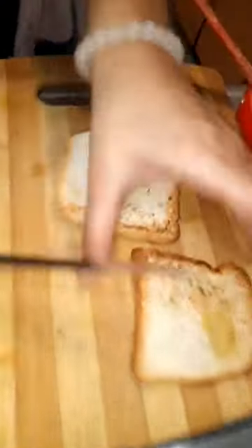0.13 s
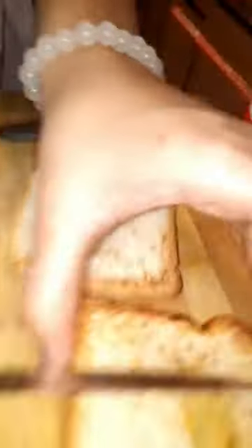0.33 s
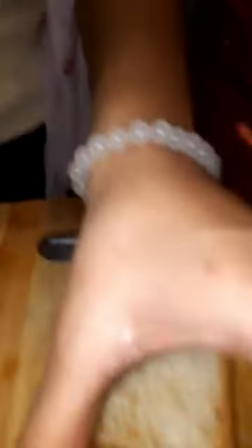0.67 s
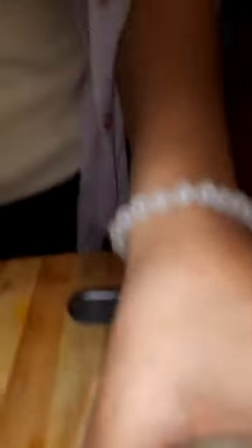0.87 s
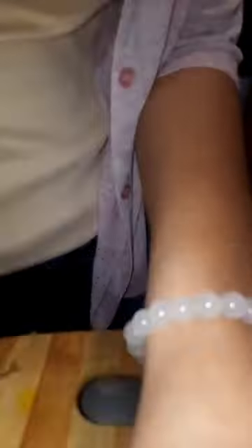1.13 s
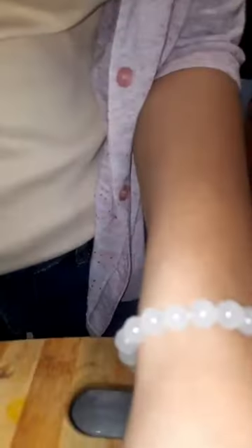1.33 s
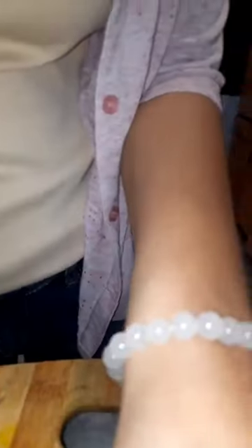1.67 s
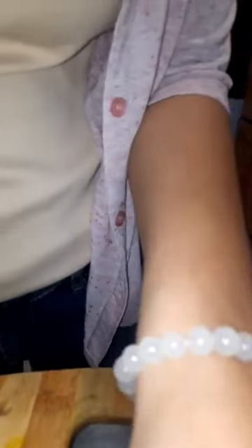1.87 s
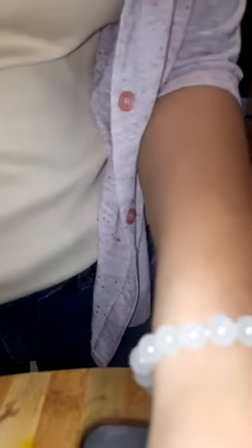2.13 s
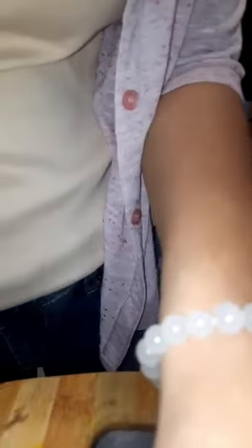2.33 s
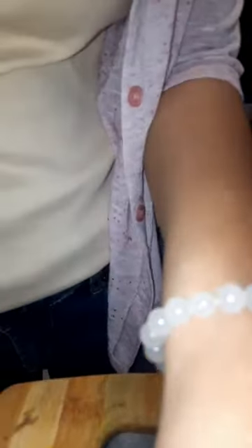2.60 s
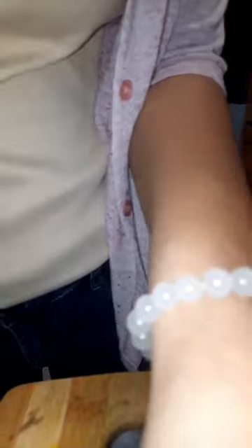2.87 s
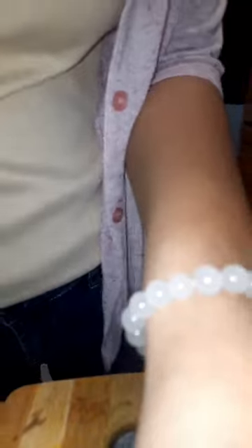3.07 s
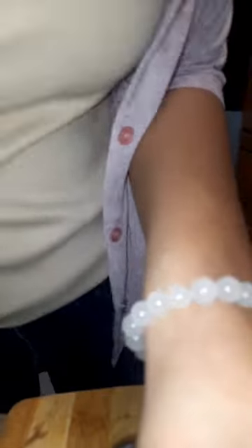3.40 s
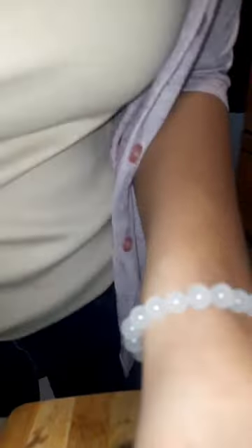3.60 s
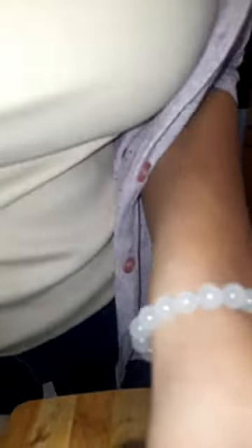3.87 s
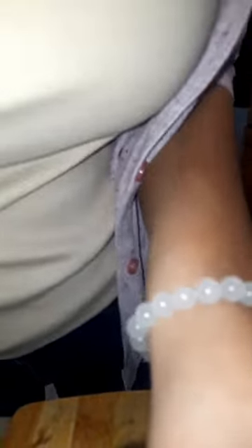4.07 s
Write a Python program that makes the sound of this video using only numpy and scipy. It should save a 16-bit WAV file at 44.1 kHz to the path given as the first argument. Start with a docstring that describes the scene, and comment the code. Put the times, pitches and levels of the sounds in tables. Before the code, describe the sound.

A knife rasps across crisp toast in short dry crunches, close up, with dull hand thumps bumping the microphone early on.

```python
"""Right beside a hand-held two-port microphone, a knife rasps over crisp toast in quick strokes.
Each stroke gates a train of tiny random clicks and lets them ring resonances of crust and crumbs; the clicks
common to both ports reach the left one late, and the body of a stroke is weak there. Clicks and smooth noise
rustle in the gaps. The gripping hand rumbles on the casing as lumpy low noise, and jolts are strongest at the
left. Short clicks make single touches, a decaying sine makes one knock, and a faint mid-band hiss fades in."""
import sys
import numpy as np
from scipy import signal
from scipy.io import wavfile

SR = 44100
rng = np.random.default_rng(int(sys.argv[2]) if len(sys.argv) > 2 else 0)


def output_pcm(signal):
    """Save a mono or channel-first signal as 16-bit PCM at the path in sys.argv[1].

    Samples are clipped to [-1, 1] before scaling.
    """
    pcm = np.clip(np.atleast_2d(signal).T, -1, 1) * 32767
    wavfile.write(sys.argv[1], SR, np.round(pcm).astype(np.int16))


N = 186498

# How the grip turns the ports. Each row: time in seconds, crunch left-right difference in dB,
# brightness in dB per octave.
GRIP_TURN = [(.2, -32, -12.5), (.32, -16, -12), (.68, -41, 12), (.85, -31, 5), (.93, -18, 5.5),
             (1.03, -37, 8), (1.13, -11, 4.5), (1.24, 1, 1.5), (1.32, -2, 3), (1.38, -36, 5),
             (1.51, -17, 3), (1.65, 3, 2.5), (2.3, 0.5, 2.5), (3.1, 4.5, 2.5), (3.53, 18, 4),
             (3.69, 5, 1.3), (3.9, 2.5, 1.5), (4.2, 5, 0.9)]
TILT_ABOUT_HZ = 1430   # brightness slopes pivot here


def from_db(db):
    """Level is logarithmic: 20 dB is a factor of ten in amplitude."""
    return 10 ** (np.asarray(db) / 20)


def rms_one(x):
    """Normalise the mean power of each row to one."""
    return x / np.sqrt(np.mean(x ** 2, axis=-1, keepdims=True) + 1e-20)


def lowpass(x, seconds):
    """First-order relaxation: one pole with the given time constant."""
    r = np.exp(-1 / (max(seconds, 1e-4) * SR))
    return signal.lfilter([1 - r], [1, -r], x + 1e-18)


def drift(rate, count):
    """Slow random fluctuation: white noise relaxed twice with corner `rate` in Hz, at rms 1."""
    seconds = 1 / (2 * np.pi * rate)
    return rms_one(lowpass(lowpass(rng.standard_normal((count, N)), seconds), seconds))


def ring(x, hz, width):
    """Resonance: a two-pole resonator passed twice for steep skirts, near rms 1 on white input of rms 1."""
    r = np.exp(-np.pi * width / SR)
    b = [(1 - r * r) / 2, 0, (r * r - 1) / 2]
    a = [1, -2 * r * np.cos(2 * np.pi * hz / SR), r * r]
    twice = signal.lfilter(b, a, signal.lfilter(b, a, x))
    return np.sqrt(2 * SR / (np.pi * width)) * twice


def along(rows, s):
    """Linear interpolation of a table's columns at the given times."""
    columns = np.transpose(rows)
    return np.array([np.interp(s, columns[0], c) for c in columns[1:]])


def room_hiss():
    """Band-limited noise: faint independent mid-band hiss at each port."""
    level_db, low_hz, high_hz, from_s = -62, 1500, 2700, 1.0
    band = signal.butter(2, [low_hz, high_hz], "band", fs=SR, output="sos")
    fade = np.clip(np.arange(N) / SR - from_s, 0, 1)   # lasts one second
    return from_db(level_db) * fade * rms_one(signal.sosfilt(band, rng.standard_normal((2, N))))


def thumping():
    """Exponential attack and decay: each thump's level rises and falls at constant dB rates above a floor."""
    # Thumps of the hand on the casing. Each row: peak time in seconds, left level in dB, right level in dB.
    thump_rows = [(0.091, -29.5, -70), (0.185, -27, -47), (0.325, -23.5, -39), (.437, -23.5, -44),
                  (0.536, -20, -48), (0.617, -23.5, -47), (0.731, -15, -41), (0.929, -16.5, -32),
                  (1.04, -27, -33), (1.09, -27, -32), (1.194, -31.5, -48), (1.28, -49, -25.5),
                  (1.381, -31, -55), (1.467, -30, -39), (1.566, -31, -31), (1.749, -60, -50),
                  (1.819, -53, -41), (2.049, -46, -38.5), (2.265, -38, -24.5), (2.499, -62, -34),
                  (2.606, -59, -48), (2.688, -55, -53), (2.907, -55, -34), (2.998, -59, -32),
                  (3.726, -64, -50.5), (3.91, -43, -35.5), (4.131, -61, -35), (4.228, -52, -37)]
    rise_db_per_s, fall_db_per_s = 313.5, 241.5
    level_db = np.ones((2, N)) * np.array([[-76], [-66.5]])   # the still hand, left and right
    t = np.arange(N) / SR
    for s, *peak_db in thump_rows:
        loss_db = np.maximum(rise_db_per_s * (s - t), fall_db_per_s * (t - s))
        level_db = np.maximum(level_db, np.array(peak_db)[:, None] - loss_db)
    return from_db(level_db)


def hand():
    """Structure-borne sound: lumpy low noise excites the casing, independently at each port."""
    lumps = rng.standard_normal((2, N)) * from_db(1.77 * drift(29, count=2))
    low = signal.sosfilt(signal.butter(2, [50, 140], "band", fs=SR, output="sos"), lumps)
    # the casing booms lower at the left port
    boom = np.array([ring(x, hz, width=53) for x, hz in zip(lumps, (77.6, 95))])
    dull = signal.sosfilt(signal.butter(2, 170, fs=SR, output="sos"), rms_one(low) + 1.3 * boom)
    rumble = signal.sosfilt(signal.butter(2, 40, "high", fs=SR, output="sos"), dull)
    return thumping() * rms_one(rumble)


def knock():
    """Damped oscillation: the blade knocks once near the right port, a sine decaying after a soft start."""
    start_s, level_db, left_re_right_db = .2142, -22.5, -29
    hz, t60_s, rise_s = 1103, 0.028, .001
    t = np.maximum(np.arange(N) / SR - start_s, 0)
    soft = (1 - np.exp(-t / rise_s)) ** 2
    decay = from_db([[left_re_right_db], [0]] - 60 * t / t60_s + level_db)
    return soft * decay * np.sin(2 * np.pi * hz * t)


def taps():
    """Impulse response: a touch of fingertip or blade is a unit impulse dulled by filters."""
    # Single ticks. Each row: start in seconds, peak level midway between the ports in dB,
    # left-right difference in dB.
    tap_rows = [(0.329, -37.5, 18), (0.44, -42.5, 9), (0.737, -29, -6), (0.939, -27, -9), (1.097, -36, 0.0),
                (1.504, -34, -23), (1.517, -29.5, -23), (1.649, -40, -3), (2.118, -30, 1.1),
                (2.222, -14, 2), (2.275, -32, -7), (2.636, -34, 1), (2.729, -34, 10), (4.097, -27, 1.1),
                (4.179, -28, 10)]
    out, tick = np.zeros((2, N)), signal.unit_impulse(SR // 50)
    tick = signal.sosfilt(signal.butter(1, [250, 1500], "band", fs=SR, output="sos"), tick)
    tick = signal.sosfilt(signal.butter(2, 3500, fs=SR, output="sos"), tick)
    for s, level_db, pan_db in tap_rows:
        at = round(s * SR)
        gain = from_db([[level_db + pan_db / 2], [level_db - pan_db / 2]])
        out[:, at:at + len(tick)] += gain * tick / np.max(tick)
    return out


def rustle_bed():
    """Amplitude modulation: gains of rustling crunch and body at both ports, and brightness, per sample."""
    # Rustle between strokes. Each row: time in seconds, nominal crunch in dB, nominal body in dB,
    # brightness in dB per octave, body left-right difference in dB.
    rustle_rows = [(0, -72.5, -65.5, 12.7, -15), (.19, -102.5, -72, -20, -5), (.27, -68, -57.5, -6, -8),
                   (.4, -63.5, -43, 2, -6), (.6, -80.5, -63, 7.5, -4), (.75, -68.5, -49, 6.5, 5.5),
                   (.95, -60, -49, 8, -4), (1.2, -46.5, -38, 3.5, -1.5), (1.4, -48.5, -40.5, 5.5, -14),
                   (1.6, -58, -51.5, 8, 5), (1.8, -48.5, -40, 6.5, -6), (2.0, -60, -43.5, 10, -1),
                   (2.3, -48, -44, 8, 8), (2.65, -55.5, -45, 7.5, 2), (3.0, -52.5, -56.5, 8, 10),
                   (3.2, -61.5, -57, 2.5, 1.5), (3.4, -67.5, -63.5, -8.5, 3), (3.6, -65.5, -57, -3, 3),
                   (3.8, -49, -48, 7, 7), (4.0, -59, -46, 4.5, 1), (4.23, -49.5, -61.5, 3, 27)]
    left_right_db, grip_share = 8.5, 0.54   # of the crunch
    t = np.arange(N) / SR
    crunch_db, body_db, airy, body_pan_db = along(rustle_rows, t)
    sides = np.array([[.5], [-.5]])
    pan_db = left_right_db + grip_share * along(GRIP_TURN, t)[0]
    return from_db(crunch_db + sides * pan_db), from_db(body_db + sides * body_pan_db), airy


def ports(draw):
    """Partial coherence: a common source, reaching the left late, mixed with an own source at each port."""
    shared, left_lag = .5, 29   # share of power; samples
    common = np.array([np.roll(draw[0], left_lag), draw[0]])
    return np.sqrt(shared) * common + np.sqrt(1 - shared) * draw[1:]


def cracks():
    """Modulated shot noise: clumped clicks of very uneven size, as two sets that differ in sign."""
    nominal_per_s, size_spread_db = 3500, 4.5
    born = rng.random((3, N)) < nominal_per_s * from_db(2.0 * drift(70, count=1)) / SR
    sizes = born * from_db(size_spread_db * np.minimum(rng.exponential(1, (3, N)), 4))
    sizes = rms_one(sizes * from_db(1.8 * drift(134, count=1)))
    return [ports(sizes * rng.choice([-1, 1], (3, N))) for k in range(2)]


def bursts():
    """Near and far pickup: strokes and jolts in time order, with their levels at each port."""
    # Bursts of breaking crust. Each row: start in seconds, length in seconds, nominal crunch in dB,
    # nominal right body in dB, left treble in dB re crunch, swell in dB, body ring in Hz.
    stroke_rows = [(0.214, .02, -45.5, -35, -47, -2, 478), (0.245, 0.019, -46, -41, -31, 7, 151),
                   (.317, 0.027, -41.5, -27, -23.5, -8.5, 159), (0.681, 0.0054, -43, -45.5, -16, 0, 180),
                   (.748, 0.011, -42, -39, -23.5, 2, 300), (0.849, 0.025, -39, -38, -10, 16, 145),
                   (0.928, 0.033, -36.5, -32.5, -17, 1, 331), (0.997, 0.0066, -35, -46, -17.5, 8, 160),
                   (1.053, 0.014, -35.5, -34, -10, -2, 300), (1.125, 0.032, -33.5, -30.5, -15.5, 2, 300),
                   (1.165, 0.0096, -41, -31, -2, 1, 306), (1.237, .014, -26, -26, -21, 12, 887),
                   (1.256, 0.018, -31, -43, -8.5, -5, 900), (1.313, .028, -30, -24, -16, 7, 332),
                   (1.374, 0.022, -37.5, -31, -16.5, -12, 327), (1.433, .0022, -31.5, -17, -16, 3, 320),
                   (1.453, .0056, -27, -29, -18, 8, 464), (1.501, .006, -48, -39, -18, 3, 317),
                   (1.515, 0.0014, -21, -18, -19, -1, 148), (1.538, 0.029, -31, -26.5, -9, -5, 758),
                   (1.648, 0.0023, -24.5, -25.5, -14.5, 3, 313), (1.681, 0.0033, -40, -47, -23, 3, 222),
                   (1.701, 0.0054, -27, -21, -16, 5, 329), (1.717, 0.019, -25.5, -28, -13, 6.5, 770),
                   (1.819, 0.0084, -23, -21, -17.5, 5, 330), (1.854, .0082, -28, -30, -17.5, 14, 473),
                   (1.891, 0.013, -33.5, -29, -24, 12, 322), (1.911, 0.0074, -38.5, -50, -6, 9, 328),
                   (1.986, .035, -26, -22.5, -16, 11.5, 320), (2.083, 0.01, -35, -25.5, -19.5, 15, 587),
                   (2.116, .011, -25.5, -18.5, -18, -2, 323), (2.185, .013, -31, -25.5, -24, 8, 250),
                   (2.216, 0.0042, -16.5, -18.5, -23, 2, 148), (2.261, 0.018, -26.5, -22.5, -31, 11.5, 300),
                   (2.287, 0.025, -31.5, -27, -10, -4, 323), (2.365, 0.0048, -31, -23.5, -23, -5, 230),
                   (2.383, 0.02, -23, -17.5, -17.5, 5.5, 482), (2.41, 0.018, -31.5, -25, -11, 11, 800),
                   (2.465, 0.046, -34.5, -29.5, -14.5, 4.5, 140),
                   (2.574, 0.038, -25.5, -22.5, -15, 9.5, 157), (2.655, 0.0039, -35, -23, -10, 3, 340),
                   (2.673, 0.019, -30, -31, -15.5, 6, 309), (2.727, .0043, -58, -42, -14, 3, 340),
                   (2.776, .015, -33, -24, -13, 5, 244), (2.802, 0.0065, -34.5, -39, -12, 5, 292),
                   (2.841, 0.0069, -62, -36.5, -20, 8, 297), (2.863, 0.0088, -32.5, -35, -14, 15, 730),
                   (2.88, 0.021, -31.5, -31.5, -12, 14, 225), (2.963, 0.04, -32.5, -35, -21.5, 9.5, 143),
                   (3.061, 0.017, -33.5, -27.5, -16, -2, 300), (3.083, 0.0045, -33, -60, -13, 12, 286),
                   (3.176, 0.02, -45, -54, -28, -1, 262), (3.265, 0.041, -57.5, -69, -37, -3, 322),
                   (3.455, 0.042, -62, -59.5, -47, -8, 190), (3.524, 0.02, -62, -59, -48, 0, 300),
                   (3.571, 0.026, -48.5, -50.5, -36, -7, 353), (3.671, 0.0031, -33, -46, -23, 1, 320),
                   (3.684, 0.0044, -32.5, -37, -9.5, 3, 158), (3.749, .02, -41.5, -42, -20.5, -2, 302),
                   (3.779, 0.024, -30.5, -34.5, -14, 8.5, 314), (3.858, 0.047, -34, -38, -13, -0.5, 395),
                   (3.972, 0.0075, -28.5, -30.5, -20.5, 4, 400), (3.985, .022, -35, -36.5, -15, 1, 303),
                   (4.095, 0.011, -28.5, -31, -12, -9, 740), (4.144, 0.0043, -24.5, -35, -20, 0, 364),
                   (4.156, 0.0048, -24.5, -35, -22, -2, 360), (4.178, 0.0056, -25, -34, -18.5, -10, 450)]
    # Dull jolts of the hand. Each row: start in seconds, length in seconds, nominal left crunch in dB,
    # nominal left body in dB.
    jolt_rows = [(.317, 0.016, -56, -32), (0.44, 0.0012, -47, -13), (0.683, 0.0054, -80, -33),
                 (0.7, 0.026, -53, -31.5), (0.732, 0.0042, -35, -13.5), (0.913, 0.0083, -45, -24),
                 (.926, 0.044, -71, -29.5), (1.059, 0.0086, -76, -41), (1.081, .0071, -67, -29.5),
                 (1.098, 0.0043, -32.5, -20.5), (1.28, 0.017, -34.5, -31.5), (1.587, 0.0071, -31, -31),
                 (2.218, 0.0022, -55, -39), (2.267, 0.028, -51, -37), (2.411, 0.019, -50, -42),
                 (2.803, 0.0043, -50, -31), (3.087, 0.004, -50, -32), (4.173, 0.0045, -55, -45)]
    jolt_right_db, jolt_treble_db, jolt_tilt_db, jolt_ring_hz = -22.5, -27, -4.5, 154
    left_body_db = -17   # a stroke's body is weak at the left port
    bright_per_treble, usual_treble_db = 0.3, -14.5   # strokes with more treble are also brighter below it
    rows = []
    for s, length, db, body_db in jolt_rows:
        rows.append((s, length, db, db + jolt_right_db, body_db + jolt_right_db, body_db, jolt_treble_db,
                     jolt_tilt_db, 0, jolt_ring_hz))
    for s, length, db, body_db, treble_db, swell_db, body_hz in stroke_rows:
        pan_db, tilt_db = along(GRIP_TURN, s)
        tilt_db += bright_per_treble * (treble_db - usual_treble_db)
        rows.append((s, length, db + min(pan_db, 0), db - max(pan_db, 0), body_db, body_db + left_body_db,
                     treble_db, tilt_db, swell_db, body_hz))
    return sorted(rows, key=lambda row: round(row[0] * 200))   # in steps of 5 ms


def stroke_shape(length, swell_db):
    """Contact envelope: faint lead-in, rounded rise, hold that swells or fades, quick fall, fainter tail."""
    rise_s, fall_s = .006, .005
    lead_s, lead_db = 0.01, -9.5   # the blade bites in gradually
    tail_s, tail_db = 0.025, -4
    rise, hold, early = max(round(rise_s * SR), 3), round(max(length, .001) * SR), SR // 20
    held = np.zeros(early + hold + SR // 6)
    held[early:early + hold] = from_db(swell_db * np.linspace(-.5, .5, hold))
    soft = np.convolve(held, np.hanning(rise) / np.hanning(rise).sum(), "same")
    lead = from_db(lead_db) * lowpass(soft[::-1], lead_s)[::-1]   # filtered backwards in time
    tail = from_db(tail_db) * lowpass(soft, tail_s)
    return early, np.maximum(soft, lowpass(soft, fall_s)) + tail + lead


def strokes(clicks):
    """Forced resonance: pressure by (zone, port), brightness over time, and the rings the clicks excite."""
    # Resonances of the crust, all rung by each stroke. Each row: frequency in Hz, nominal level in dB.
    crust_modes = [(1150, -6.5), (1400, -6.5), (2350, -5.5), (3100, -7.5)]
    mode_spread_db = 2.5   # strengths vary from stroke to stroke
    body_width_hz, body_ring_db = 79.5, -4.5   # ring levels are relative to the stroke
    crust_width_hz, crust_ring_db, right_ring_db = 198, -10, -6   # the crust rings less at the right port
    crumb_width_hz, crumb_ring_db, crumb_slope_db = 260, -13, -10   # slope per octave
    right_treble_db = 4
    pressure, bright, rings = np.zeros((3, 2, N)), np.zeros(N), np.zeros((2, N))
    rows = bursts()
    crumbs_hz = 1500 * 2 ** rng.uniform(0, 2.1, (len(rows), 4))   # loose crumbs ring at chance pitches
    strengths_db = mode_spread_db * rng.standard_normal((len(rows), len(crust_modes)))
    for row, crumbs, chance_db in zip(rows, crumbs_hz, strengths_db):
        s, length, left_db, right_db, right_body_db, left_body_db, treble_db, tilt_db, swell_db, body_hz = row
        early, shape = stroke_shape(length, swell_db)
        start = round(s * SR) - early
        at = slice(start, min(start + len(shape), N))
        shape = shape[:at.stop - at.start]
        body = from_db([[left_body_db], [right_body_db]])
        crunch = from_db([[left_db], [right_db]])
        treble = crunch * from_db([[treble_db], [treble_db + right_treble_db]])
        pressure[:, :, at] += np.array([body, crunch, treble]) * shape
        bright[round(s * SR) - SR // 200:] = tilt_db   # holds until the next burst
        drive = clicks[:, at] * shape
        rings[:, at] += body * from_db(body_ring_db) * ring(drive, body_hz, body_width_hz)
        crust = 0
        for (hz, db), luck in zip(crust_modes, chance_db):
            mode_db = db + luck + tilt_db * max(np.log2(hz / TILT_ABOUT_HZ), 0)
            crust = crust + from_db(mode_db) * ring(drive, hz, crust_width_hz)
        rings[:, at] += crunch * from_db([[crust_ring_db], [crust_ring_db + right_ring_db]]) * crust
        for hz in crumbs:
            level_db = crumb_ring_db + (tilt_db + crumb_slope_db) * np.log2(hz / TILT_ABOUT_HZ)
            rings[:, at] += crunch * from_db(level_db) * ring(drive, hz, crumb_width_hz)
    return pressure, bright, rings


def power_share(colour, hz, width, zone):
    """Power summation: band gains at each port, so that each zone of bands sums to power 1 on white input."""
    table = np.array(colour)
    gain = from_db([np.interp(np.log(hz), np.log(table[:, 0]), c) for c in table.T[1:]])
    for z in set(zone):
        inside = zone == z
        power = np.sum(gain[:, inside] ** 2 * width[inside], axis=1, keepdims=True) * 2 / SR
        gain[:, inside] /= np.sqrt(power)
    return gain


def scraping():
    """Filter-bank synthesis: cracks under the strokes and rustle between them, coloured band by band."""
    # Relative spectra of cracks and rustle, each levelled again within its zones of bands.
    # Each row: frequency in Hz, left density in dB per Hz, right density in dB per Hz.
    crack_colour = [(99, -15.5, 3), (300, 19, 6.5), (705, -15, 1), (808, 1, 7.5), (1312, 2, -2.5),
                    (1805, -14, -9), (2270, 2, -2.5), (2870, -2.5, -18), (4640, -13.5, -18),
                    (6270, -26, -26), (7600, -24.5, -37.5), (9960, -35.5, 8.5), (11580, -3, -40),
                    (12300, 5, 0), (13900, -5, 13.5)]
    rustle_colour = [(110, -3, -16.5), (231, 16, 1.5), (721, 2.5, -15), (900, -4, 16), (1420, 2, 5.5),
                     (2060, -2, -2), (3430, -13.5, -19), (4480, -22, -24), (7060, -38, -24.5),
                     (10300, -48.5, -60), (14000, -42, -31)]
    body_top_hz, treble_from_hz = 750, 9000
    edges = np.r_[90, 140, 220, 330, 470, 650 * 2 ** (np.arange(20) / 4)]   # Hz
    hz, width = np.sqrt(edges[1:] * edges[:-1]), np.diff(edges)
    zone = (hz > body_top_hz).astype(int) + (hz > treble_from_hz)   # 0 body, 1 crunch, 2 treble
    crack_gain = power_share(crack_colour, hz, width, zone)
    rustle_gain = power_share(rustle_colour, hz, width, np.minimum(zone, 1))
    clicks, smooth = cracks(), rng.standard_normal((2, 2, N))
    noise = 0.66 * smooth + 0.33 * np.array(cracks())   # smooth noise and falling crumbs
    pressure, bright, out = strokes(clicks[0])
    crunch, body, airy = rustle_bed()
    rustle = [body, crunch, crunch]
    patches = drift(20.2, count=9)   # each patch of crust has its own colour
    flutter = from_db(3.0 * drift(9.4, count=3))
    for k in range(len(hz)):
        octaves = max(np.log2(hz[k] / TILT_ABOUT_HZ), 0)
        colour_db = 3.3 * patches[k % 9] + (zone[k] == 1) * bright * octaves
        # a fixed 5.5 dB trim balances the cracks against their rings
        drive = crack_gain[:, k, None] * pressure[zone[k]] * clicks[k % 2] * from_db(colour_db - 5.5)
        bed = rustle[zone[k]] * flutter[k % 3] * from_db(airy * octaves)
        drive += rustle_gain[:, k, None] * noise[k % 2] * bed
        band = signal.butter(3, edges[k:k + 2], "band", fs=SR, output="sos")
        out += signal.sosfilt(band, drive)
    return out


def scene():
    """Superposition: room, the hand that holds the microphone, knock, single touches and knife on toast."""
    return room_hiss() + hand() + knock() + taps() + scraping()


def record(dry):
    """Transfer function of the ports: a deep dip near 9 kHz, faint self-noise, and the top cut."""
    stop_from_hz = 15790
    dip = signal.sosfilt(signal.butter(3, [7600, 10100], "bandstop", fs=SR, output="sos"), dry)
    dip += from_db(-88.0) * rng.standard_normal(dry.shape)
    return signal.sosfilt(signal.cheby2(12, 70, stop_from_hz, fs=SR, output="sos"), dip)


dry = scene()
out = record(dry)
output_pcm(out)
```